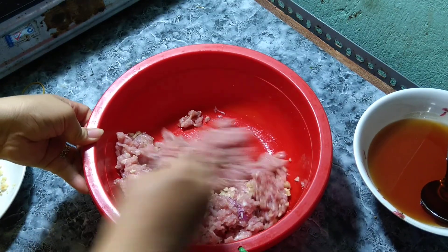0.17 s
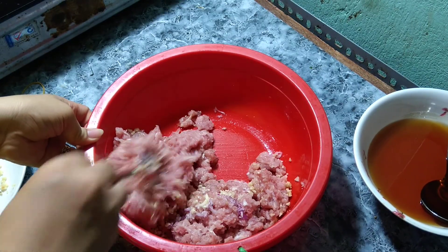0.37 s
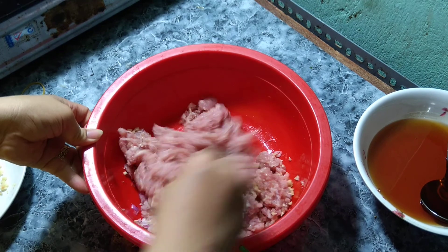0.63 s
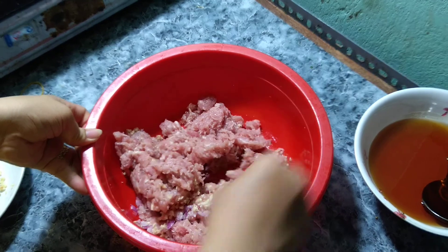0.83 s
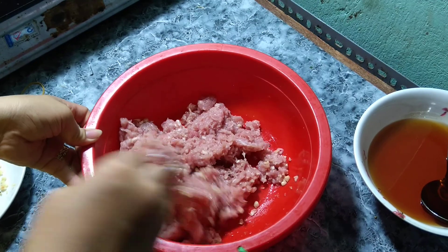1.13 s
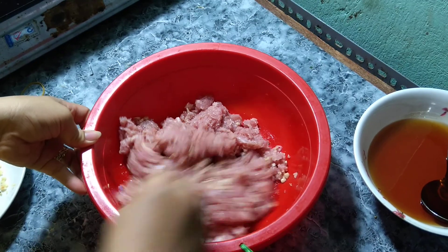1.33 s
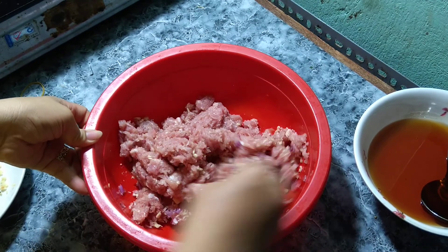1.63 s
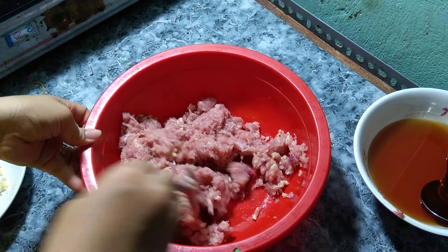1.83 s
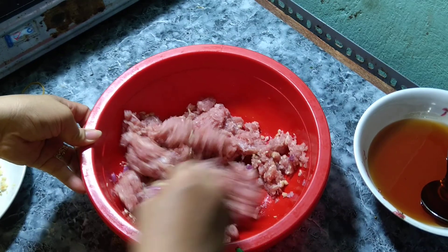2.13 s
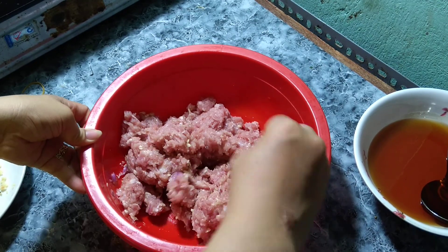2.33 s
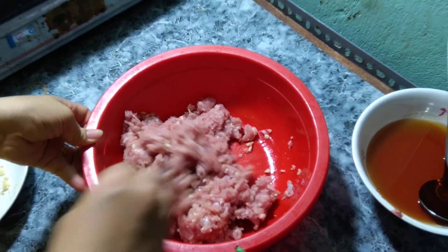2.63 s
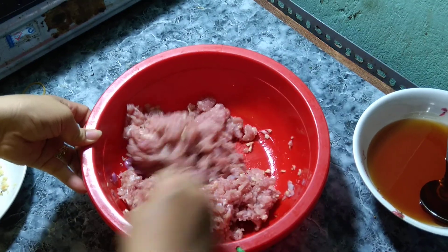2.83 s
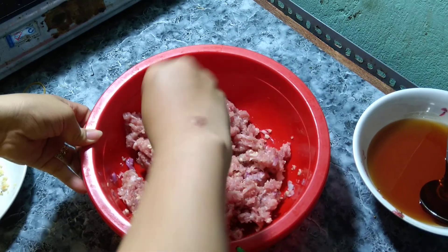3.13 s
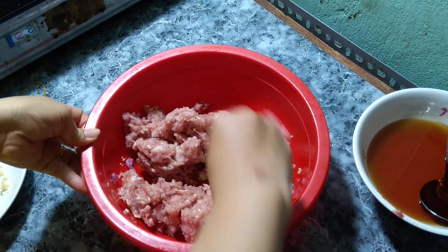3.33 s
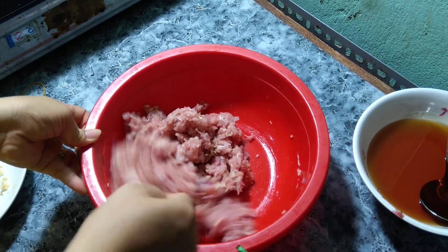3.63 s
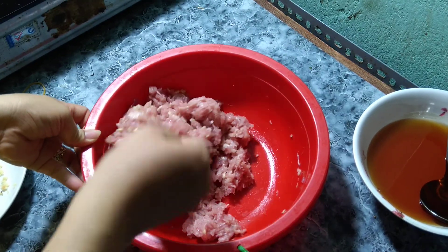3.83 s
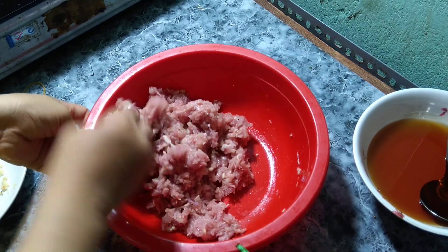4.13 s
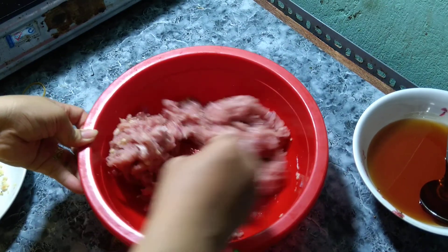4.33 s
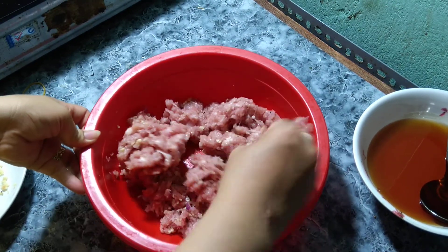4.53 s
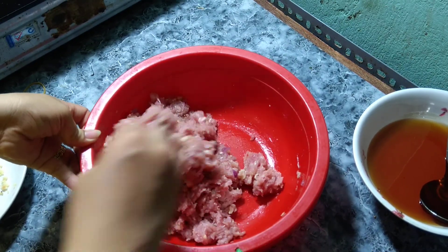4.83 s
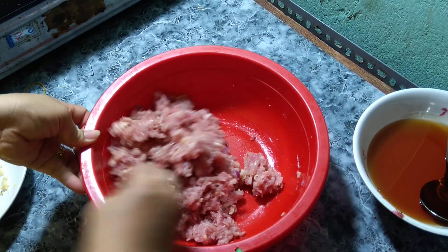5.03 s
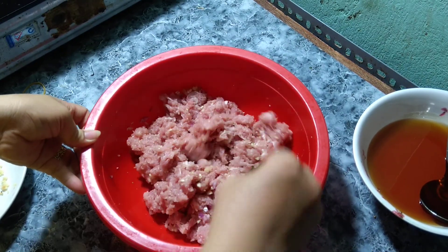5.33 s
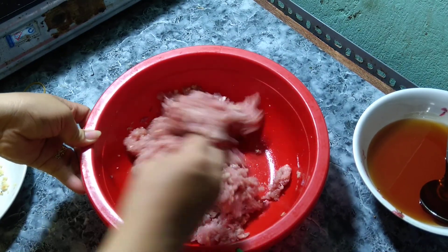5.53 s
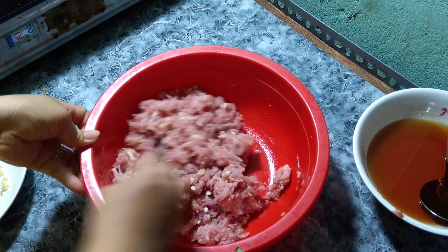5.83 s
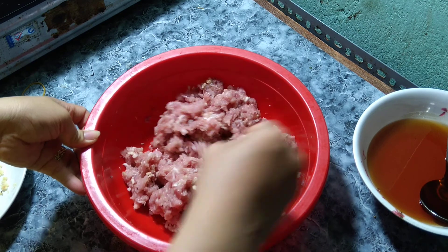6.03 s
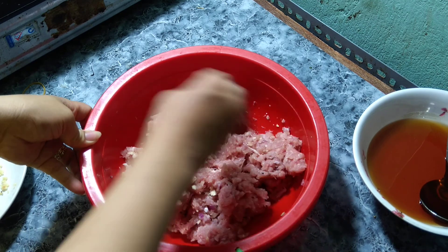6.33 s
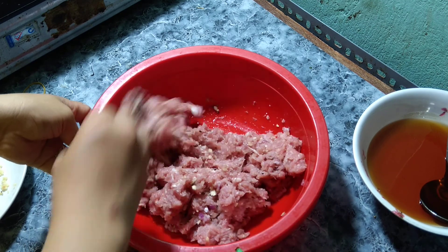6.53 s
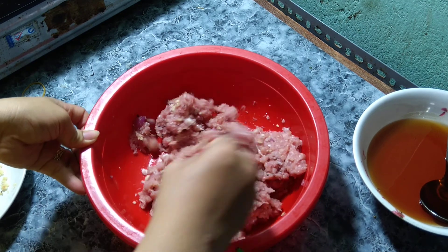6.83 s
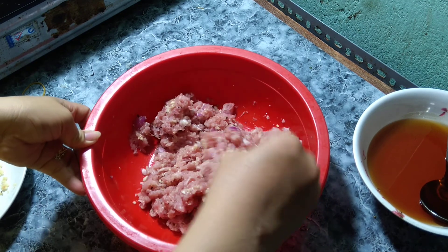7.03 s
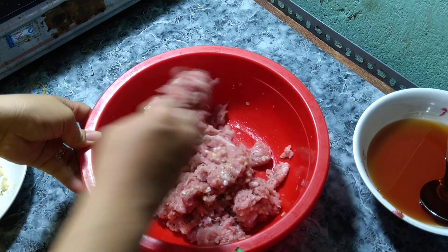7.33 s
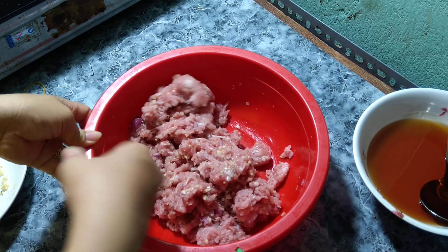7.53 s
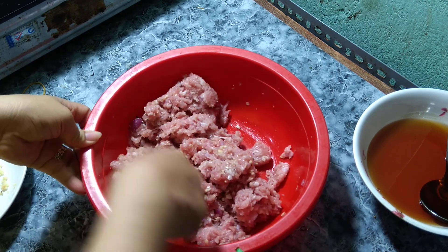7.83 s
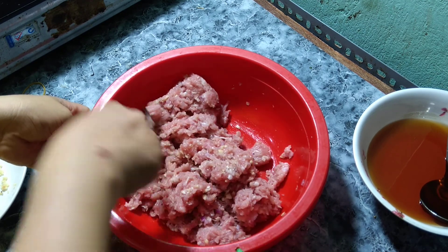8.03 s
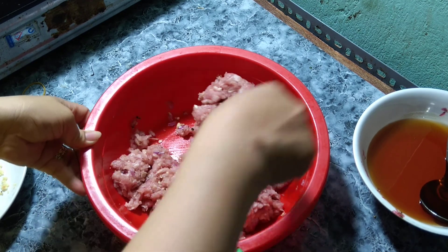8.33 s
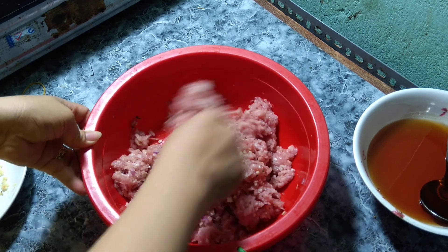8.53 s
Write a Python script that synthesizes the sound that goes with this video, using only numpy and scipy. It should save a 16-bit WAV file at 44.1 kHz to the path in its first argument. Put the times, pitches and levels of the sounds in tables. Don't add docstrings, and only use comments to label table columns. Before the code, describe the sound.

Close, sticky squelching of raw mince being worked by hand in a plastic bowl, with wet pops and knuckle thuds above a soft low drone.

```python
import sys
import numpy as np
from scipy import signal
from scipy.fft import rfft, irfft, next_fast_len
from scipy.io import wavfile

SR = 44100
rng = np.random.default_rng(int(sys.argv[2]) if len(sys.argv) > 2 else 0)


def attenuation_scalar(level_db):
    decades = np.asarray(level_db, float) / 20
    return 10 ** decades


def log_audio(samples):
    frames = np.atleast_2d(samples).T
    limited = np.clip(frames, -1, 1)
    pcm = np.round(limited * 32767).astype(np.int16)
    wavfile.write(sys.argv[1], SR, pcm)


N = 383229

# time in seconds, then levels in dB of the drag on the wall, the coarse squelch,
# the wet tearing and the fine fizz.
STROKES = [(0.0, -54, -68, -68, -57), (0.02, -77, -79, -87, -66), (0.07, -62, -82, -66, -65.5),
           (0.22, -62.5, -39, -43.5, -42.5), (0.39, -84, -77, -61, -57.5), (0.48, -76, -73, -68, -58.5),
           (0.56, -68, -39.5, -52, -50), (0.65, -54.5, -42.5, -44, -47), (0.82, -70.5, -71, -68.5, -63),
           (0.87, -76, -69.5, -54, -49.5), (1.09, -77.5, -46.5, -49.5, -52), (1.19, -71, -76, -71, -61),
           (1.23, -60, -89, -72, -51), (1.28, -58, -44, -55, -55.5), (1.43, -53, -54, -52, -47),
           (1.5, -69, -86, -58, -55), (1.55, -85, -48, -52, -52), (1.6, -61, -64, -69, -59),
           (1.69, -73, -76, -62.5, -50), (1.79, -85, -45.5, -50.5, -52), (1.94, -83, -82, -71, -57.5),
           (2.01, -78, -85, -60.5, -54), (2.08, -68, -32, -50.5, -54.5), (2.22, -58, -49, -45, -48),
           (2.37, -73, -76, -93.5, -83), (2.42, -69, -88, -91, -54), (2.44, -72, -51, -42, -44),
           (2.52, -53, -43.5, -41.5, -52.5), (2.71, -75.5, -87.5, -74.5, -52), (2.83, -49, -52, -54, -51.5),
           (2.95, -56.5, -39, -44, -45.5), (3.05, -63, -82, -70.5, -69), (3.15, -56, -73, -86, -84),
           (3.19, -68, -90, -87, -90), (3.24, -47, -59, -62, -57), (3.36, -54, -58, -51, -58),
           (3.43, -67, -61, -53, -49), (3.56, -76, -73.5, -55.5, -48), (3.75, -80.5, -41, -41, -48),
           (4.06, -76.5, -92.5, -94, -58.5), (4.14, -85, -74, -75, -57.5), (4.19, -69, -45.5, -55.5, -54),
           (4.36, -56.5, -37.5, -41, -44.5), (4.55, -79, -88, -90, -77), (4.57, -67, -46, -55, -57),
           (4.6, -68, -48, -31.5, -37), (4.62, -52, -41.5, -36, -42.5), (4.77, -72, -44, -47.5, -45.5),
           (4.86, -87, -68, -65.5, -51.5), (4.96, -79, -48, -58, -56.5), (5.18, -68.5, -48.5, -44.5, -46),
           (5.35, -78, -92, -77.5, -62), (5.39, -76, -85, -93, -76), (5.42, -53, -39.5, -48.5, -51.5),
           (5.57, -58.5, -50.5, -48, -50.5), (5.69, -67, -74, -63, -51.5), (5.76, -61, -51, -58, -51),
           (5.98, -66.5, -51, -46.5, -45), (6.12, -62.5, -85.5, -74.5, -73), (6.24, -69, -88, -75.5, -53),
           (6.29, -72, -48, -43.5, -48.5), (6.68, -75, -55, -53, -50), (6.87, -84, -50.5, -47, -48),
           (7.04, -73, -106, -73, -62), (7.12, -62, -80, -66, -52), (7.14, -52, -40, -47, -49.5),
           (7.31, -79, -50, -45.5, -46), (7.43, -69, -62, -67, -56), (7.53, -51, -45, -53, -51),
           (7.67, -60.5, -78.5, -88, -70), (7.74, -68, -87.5, -93, -92), (7.84, -70, -74, -79, -73.5),
           (7.96, -74.5, -85.5, -90, -91.5), (8.06, -74.5, -84, -87.5, -90), (8.11, -66.5, -49, -46, -43.5),
           (8.13, -53, -45.5, -47, -45), (8.25, -60, -50.5, -50, -46.5), (8.35, -68.5, -78, -72, -66.5),
           (8.42, -64.5, -82, -86, -86), (8.47, -62, -89, -87.5, -87), (8.52, -54, -36.5, -43.5, -46),
           (8.62, -61.5, -41, -39.5, -36.5), (8.69, -56, -53, -54, -51)]
STROKE_HZ = [500, 1800, 4500, 10000]
# frequency in Hz, density in dB per Hz.
SQUELCH_COLOUR = [(260, 4.5), (400, 5.5), (700, -7.5), (1000, -8.5), (1500, -7), (2500, -9), (4000, -6.5),
                  (6000, -9.5), (9500, -6.5), (11500, -11), (15500, -15.5)]
# time in seconds, level in dB.
DRONE_LEVEL = [(0.0, -49), (0.09, -41.5), (0.46, -48), (0.6, -35), (0.77, -55), (0.89, -44.5),
               (1.06, -51.5), (1.21, -36), (1.26, -48), (1.31, -32.5), (1.35, -42.5), (1.52, -42.5),
               (1.74, -48.5), (2.03, -47), (2.05, -51), (2.08, -45), (2.15, -39), (2.42, -44),
               (2.44, -42.5), (2.66, -41), (3.19, -38), (3.24, -34.5), (3.29, -39.5), (3.41, -52),
               (3.51, -40.5), (3.6, -56.5), (3.68, -42.5), (3.77, -50), (3.92, -42.5), (4.11, -51),
               (4.19, -45.5), (4.36, -57), (4.4, -38), (4.57, -49), (4.6, -38), (4.79, -56.5),
               (4.89, -40.5), (4.96, -46.5), (5.28, -42.5), (5.44, -38.5), (5.54, -44), (5.61, -36.5),
               (5.71, -41), (5.86, -33.5), (6.0, -32), (6.1, -40.5), (6.19, -34.5), (6.32, -43),
               (6.36, -37), (6.61, -41.5), (6.66, -35), (6.7, -43), (6.97, -56), (7.04, -35.5), (7.09, -45),
               (7.14, -35), (7.45, -43.5), (7.53, -34.5), (7.6, -37), (7.65, -46), (7.74, -34.5),
               (7.77, -40), (7.89, -41), (7.94, -46.5), (8.01, -39), (8.15, -38), (8.5, -40), (8.54, -37.5),
               (8.69, -44)]
# frequency in Hz, width in Hz, level in dB.
DRONE_MODES = [(66, 15, -13), (100.6, 22, -4.5), (123.7, 13, 0), (151.1, 26, -8.5), (178.2, 14.4, -3),
               (211, 26, -11)]
# time in seconds, peak in dB, hardness in dB.
KNOCKS = [(0.553, -33.5, -8), (0.627, -31, -6), (1.189, -47.5, -11), (1.291, -27, -7), (1.405, -51, -12),
          (2.061, -8.5, -8.5), (2.44, -24, -9), (2.786, -26.5, -20), (3.23, -20, -23), (3.419, -25, -7.5),
          (4.189, -20, -36), (4.391, -40.5, 5), (4.568, -30, 3), (4.593, -19, 4), (5.022, -33.5, -13),
          (5.411, -16.5, -2.5), (6.29, -44, 3.5), (6.66, -35.5, -8), (7.131, -22.5, -17), (7.265, -37, -9),
          (8.111, -16, -29), (8.228, -35.5, -11), (8.619, -28.5, -9)]
# frequency in Hz, level in dB, t60 in seconds.
BOWL_LOW = [(178, -6, 0.22), (251.3, -10, 0.14), (377.5, 1.5, 0.094), (482.2, -4.5, 0.16), (550, -4, 0.08),
            (644.2, 2.5, 0.092), (758, 2, 0.096), (835, -0.5, 0.07), (975, -16.5, 0.079),
            (1125, -1.5, 0.067), (1176, -14.5, 0.12)]
# frequency in Hz, level in dB, t60 in seconds.
BOWL_TOP = [(1500, 1, 0.082), (1770, -4.5, .05), (2030, -10, .05), (2664, 5.5, 0.026), (2970, 1.5, .04),
            (3700, 1.5, 0.036)]
# time in seconds, peak in dB, pitch in Hz.
POPS = [(0.1565, -27.5, 3380), (0.5077, -47, 3770), (0.5437, -37, 2680), (0.837, -45, 9280),
        (0.8619, -40, 8870), (1.1887, -43, 9320), (1.2136, -36, 10400), (1.2326, -45, 10900),
        (1.2426, -39, 9470), (1.2785, -34, 2530), (1.516, -24, 9800), (1.5354, -34, 1770),
        (1.6008, -35, 1670), (1.6656, -43, 9220), (1.7409, -40, 9540), (1.9475, -42, 10100),
        (2.0258, -39, 9060), (2.0612, -17, 1500), (2.1321, -21, 2260), (2.1495, -20, 1780),
        (2.4054, -45, 9300), (2.4448, -16, 5360), (2.5122, -17, 4000), (2.6289, -31.5, 10200),
        (2.6908, -47, 9990), (2.7232, -49, 9770), (2.7811, -48, 1500), (2.817, -38, 1550),
        (3.2176, -36.5, 8700), (3.2306, -35, 2690), (3.3014, -44, 10500), (3.3209, -30, 4230),
        (3.4201, -40, 1980), (3.4421, -27, 9190), (3.4895, -40, 9150), (3.8771, -46, 9220),
        (3.9629, -41.5, 9980), (4.1689, -37.5, 1850), (4.1874, -39, 1620), (4.2802, -25, 3040),
        (4.5645, -30, 1770), (4.5925, -2, 2990), (4.6558, -24, 3700), (4.8509, -41, 9740),
        (5.2969, -45, 10060), (5.4026, -40, 9400), (5.4111, -24, 1760), (5.474, -25, 2610),
        (5.4844, -18, 3570), (5.4939, -15, 3970), (5.7184, -31, 9530), (5.7733, -36, 1870),
        (6.2043, -49.5, 10300), (6.2597, -38.5, 8320), (6.2911, -23.5, 2920), (6.544, -35, 9570),
        (6.9471, -25, 9200), (7.0853, -48, 10000), (7.1322, -32, 1810), (7.1921, -30, 1720),
        (7.217, -15, 5200), (7.5068, -16.5, 10600), (7.6226, -46.5, 9200), (8.0915, -43.5, 3450),
        (8.0935, -33, 10400), (8.1115, -29, 2020), (8.1738, -29, 8570), (8.5041, -24.5, 1630),
        (8.5375, -19.5, 2040), (8.5739, -23, 1850)]
# frequency in Hz, left-right likeness from 0 to 1.
LIKENESS = [(60, 0.96), (180, 0.91), (550, 0.54), (1650, 0.053), (4970, 0.04), (15000, 0.049)]
# frequency in Hz, left minus right in dB.
LEAN = [(60, -6.5), (150, -11), (300, -8), (1000, -7), (4000, -8), (8000, -8.5), (13000, -4.5)]


def rms_one(x):
    return x / np.sqrt(np.mean(x ** 2) + 1e-20)


def in_time(rows):
    s, *columns = np.transpose(rows)
    t = np.arange(N) / SR
    return np.array([np.interp(t, s, column) for column in columns])


def at_hz(points, hz):
    point_hz, value = np.transpose(points)
    return np.interp(np.log(hz), np.log(point_hz), value)


def drift(rate_hz):
    stride = 40
    r = np.exp(-2 * np.pi * rate_hz * stride / SR)
    chance = rng.standard_normal(N // stride + 2002)
    slow = signal.lfilter([1], [1, -2 * r, r * r], chance)[2000:]
    return np.interp(np.arange(N) / stride, np.arange(len(slow)), rms_one(slow))


def ring(clicks, hz, t60):
    r = attenuation_scalar(-60 / (t60 * SR))
    w = 2 * np.pi * hz / SR
    return signal.lfilter([0, np.sin(w)], [1, -2 * r * np.cos(w), r * r], clicks + 1e-18)


def ports(mid, side, hz):
    alike = np.clip(at_hz(LIKENESS, hz), 0, 1)
    pair = np.sqrt(1 + alike) * mid + np.sqrt(1 - alike) * side * [[1], [-1]]
    return pair * attenuation_scalar(at_hz(LEAN, hz) * np.array([[.5], [-.5]]))


def drone():
    out = 0
    for hz, width_hz, level_db in DRONE_MODES:
        r = np.exp(-np.pi * width_hz / SR)
        poles = [1, -2 * r * np.cos(2 * np.pi * hz / SR), r * r]
        mid, side = signal.lfilter([1, 0, -1], poles, rng.standard_normal((2, N)))
        out = out + attenuation_scalar(level_db + 2.0 * drift(4)) * rms_one(ports(mid, side, hz))
    out = signal.sosfilt(signal.butter(4, [52, 250], "band", fs=SR, output="sos"), out)
    return attenuation_scalar(in_time(DRONE_LEVEL)[0] - 1.0) * rms_one(out)


def kitchen(x):
    t60_s, wall_cut_hz = .3, 5300
    size = next_fast_len(N + SR)
    z = np.exp(-2j * np.pi * np.arange(size // 2 + 1) / size)
    dull = np.exp(-2 * np.pi * wall_cut_hz / SR)
    wall = (1 - dull) / (1 - dull * z)
    answer = np.zeros((2, len(z)), complex)
    lags = (rng.uniform(.006, .03, 12) * SR).astype(int)
    for k, lag in enumerate(lags):
        loop = attenuation_scalar(-60 * lag / SR / t60_s) * wall * z ** lag
        answer[k % 2] += loop / (1 - loop) * (-1) ** (k // 2)
    return irfft(rfft(x, size) * answer, size)[:, :N]


def knocks():
    s, peak_db, hard_db = np.transpose(KNOCKS)
    at = np.round(s * SR).astype(int)
    modes = BOWL_LOW + BOWL_TOP
    luck = rng.standard_normal((len(s), len(modes), 2))
    out = 0
    for k, (hz, level_db, t60) in enumerate(modes):
        top_db = (hard_db - 1.0) * (k >= len(BOWL_LOW))
        clicks = np.zeros((2, N))
        clicks[0, at] = attenuation_scalar(peak_db + level_db - 17.0 + top_db + 3.9 * luck[:, k, 0])
        clicks[1, at] = clicks[0, at] * luck[:, k, 1]
        out = out + ports(*ring(clicks, hz, t60), hz)
    return out


def pops(cycles, rise, crack):
    length = 900
    t = np.arange(length) / SR
    out = np.zeros((2, N + length))
    noise = rng.standard_normal((len(POPS), 2, length))
    for (s, peak_db, hz), puff in zip(POPS, noise):
        fade = np.exp(-t * hz / cycles)
        glide = 1 + rise * t * hz / cycles
        tone = np.sin(2 * np.pi * hz * t * glide) * fade
        mid, side = tone * [[1], [.6]] + crack * puff * np.exp(-t / 0.0018)
        at = round(s * SR)
        out[:, at:at + length] += attenuation_scalar(peak_db - 4.0) * ports(mid, side, hz)
    return out[:, :N]


def squelch(films_per_s, spread_db, film_s, bed, patchy_db):
    tears = rng.random(N) < films_per_s * attenuation_scalar(4.0 * drift(25)) / SR
    film_db = spread_db * np.minimum(rng.exponential(1, N), 4.5)
    torn = tears * attenuation_scalar(film_db)
    bursts = bed + rms_one(signal.lfilter([1], [1, -np.exp(-1 / (film_s * SR))], torn))
    white = rng.standard_normal((2, 2, N)) * rms_one(bursts)
    strokes = in_time(STROKES)
    edges = 250 * 2 ** np.arange(0, 6.01, 1 / 3)
    out = 0
    for k, (low, high) in enumerate(zip(edges, edges[1:])):
        hz = np.sqrt(low * high)
        band = signal.butter(2, [low, high], "band", fs=SR, output="sos")
        mid, side = signal.sosfilt(band, white[k % 2])
        weights = [np.interp(np.log(hz), np.log(STROKE_HZ), row) for row in np.eye(4)]
        patches = np.minimum(patchy_db * drift(7), 3.0)
        level_db = weights @ strokes + at_hz(SQUELCH_COLOUR, hz) + patches + 14
        out = out + attenuation_scalar(level_db) * ports(mid, side, hz)
    return out


def scene():
    hiss = attenuation_scalar(-82.5) * rng.standard_normal((2, N))
    hits = knocks() + pops(cycles=3.2, rise=0.039, crack=0.32)
    wet = squelch(films_per_s=990, spread_db=-4.5, film_s=0.001, bed=1.0, patchy_db=3.0)
    return hits + attenuation_scalar(-10.5) * kitchen(hits) + wet + drone() + hiss


def band_limit(x):
    return signal.sosfilt(signal.butter(12, 16500, fs=SR, output="sos"), x)


def record(dry):
    low_pass = signal.cheby2(12, 70, 15900, fs=SR, output="sos")
    mix = signal.sosfilt(low_pass, dry)
    return band_limit(mix)


dry = scene()
out = record(dry)
log_audio(out)
```